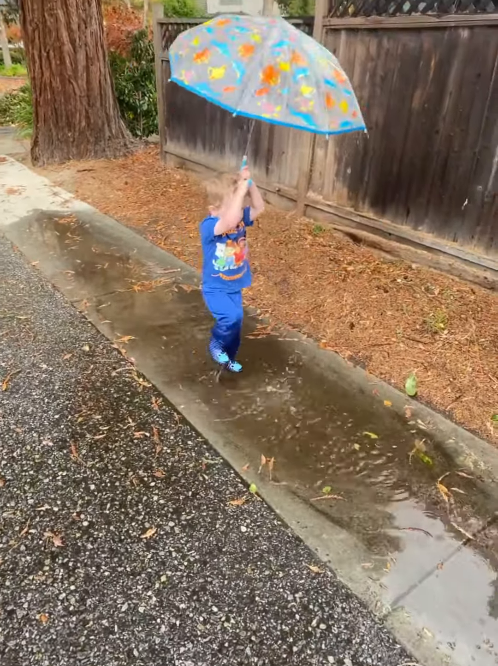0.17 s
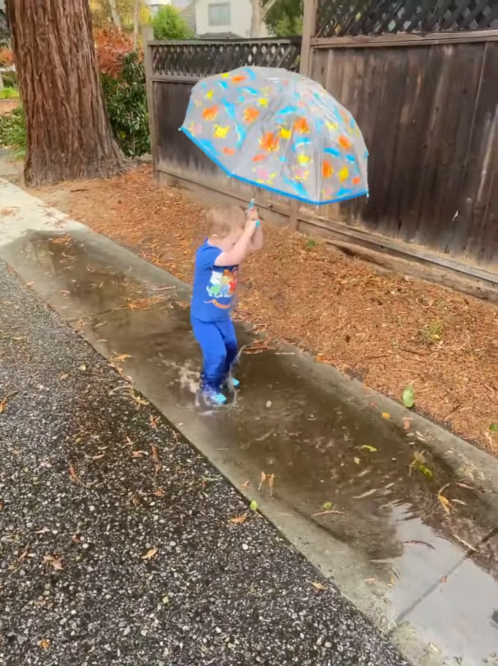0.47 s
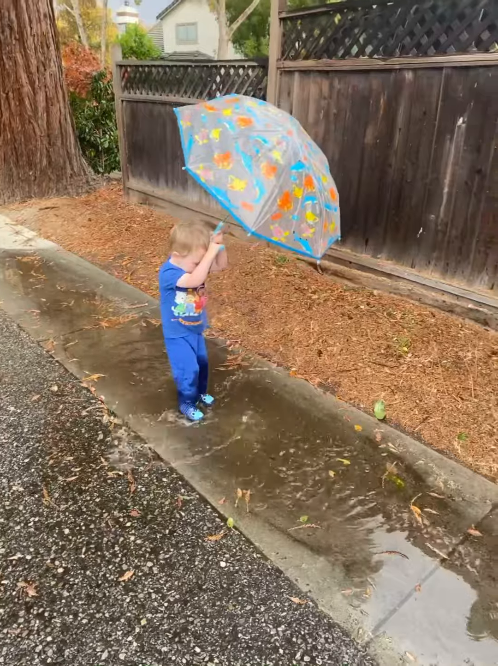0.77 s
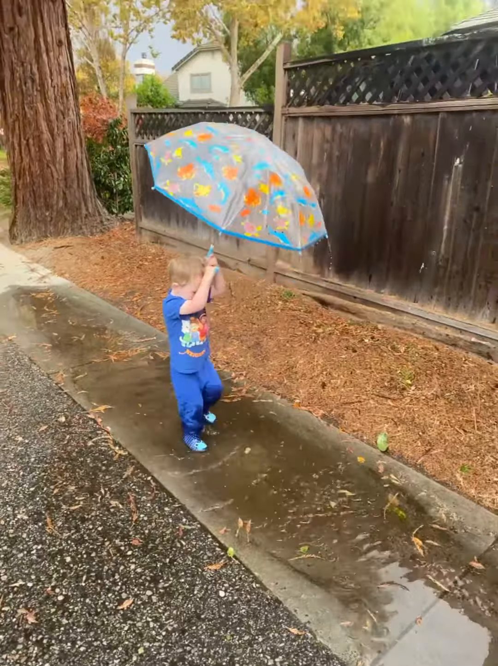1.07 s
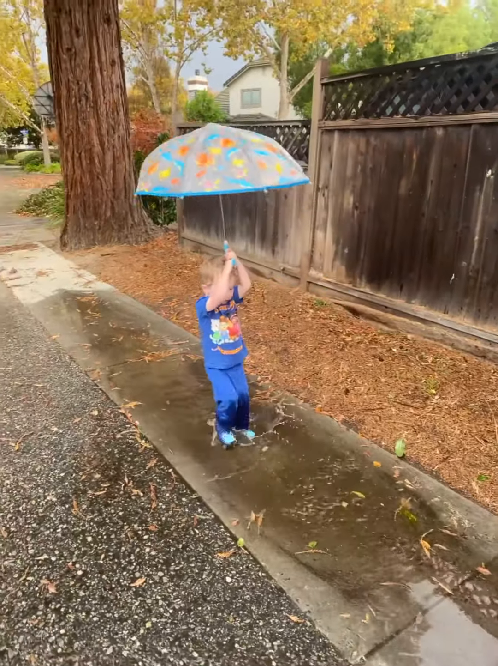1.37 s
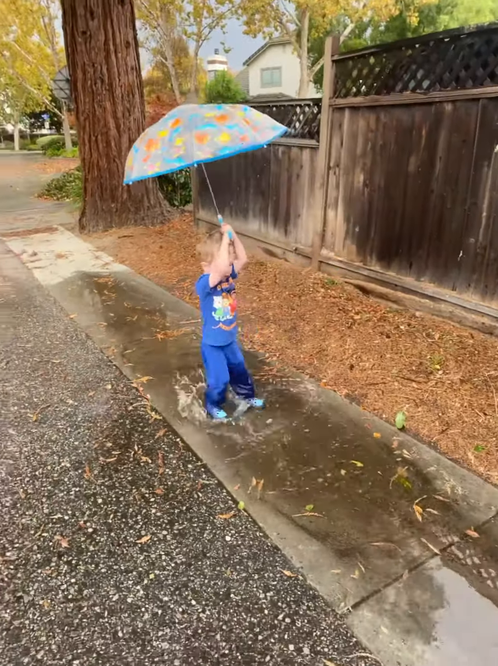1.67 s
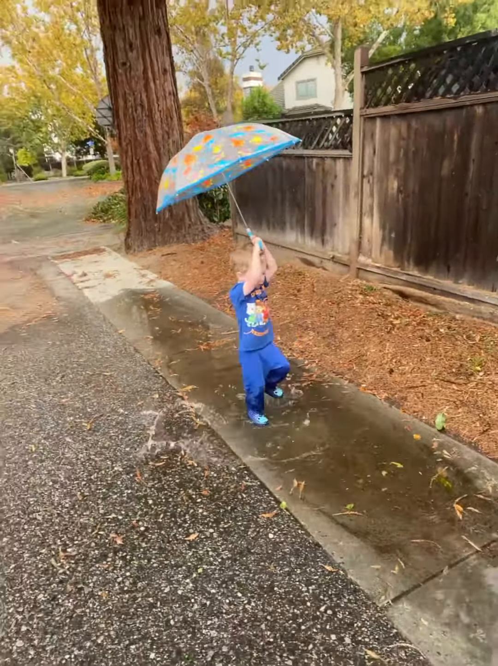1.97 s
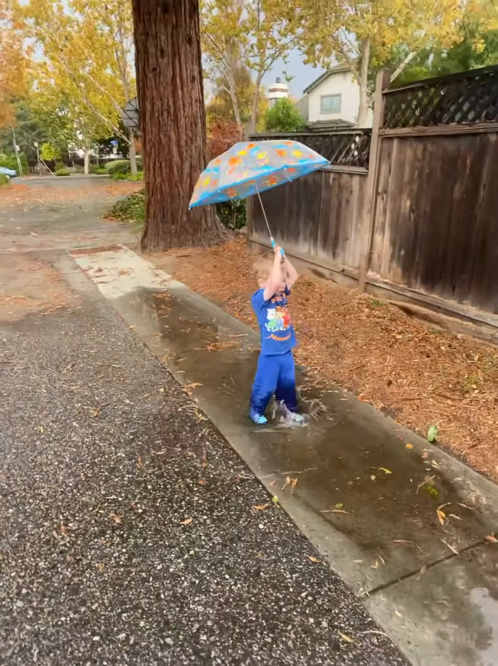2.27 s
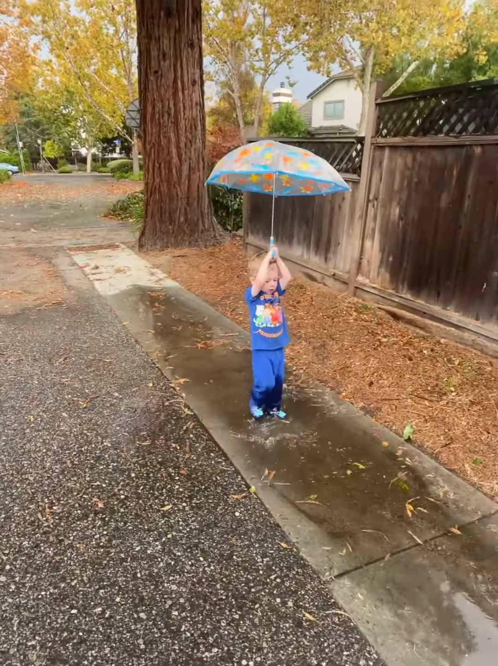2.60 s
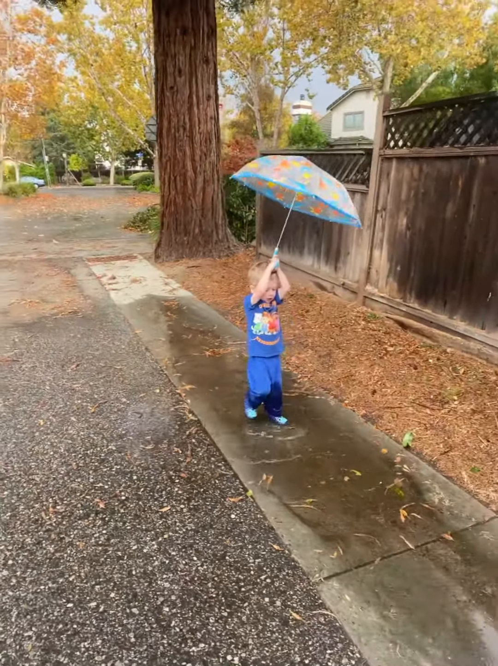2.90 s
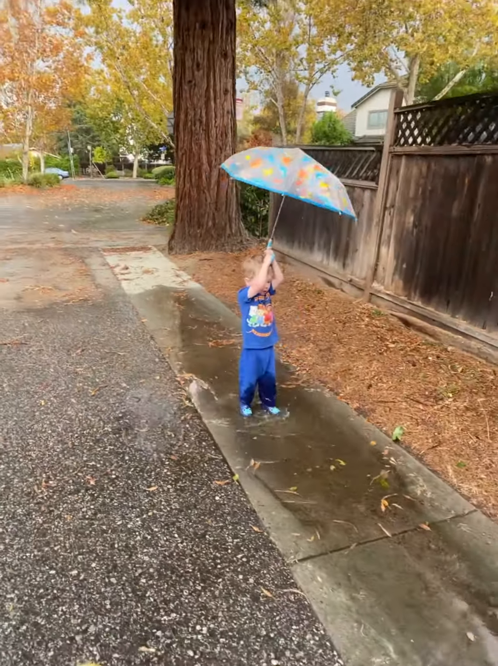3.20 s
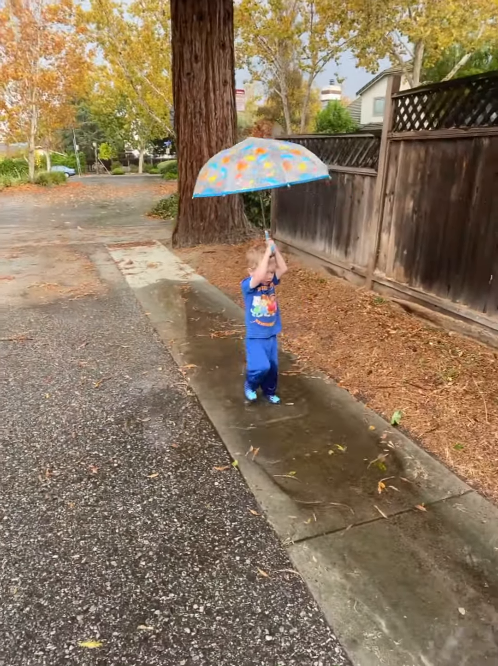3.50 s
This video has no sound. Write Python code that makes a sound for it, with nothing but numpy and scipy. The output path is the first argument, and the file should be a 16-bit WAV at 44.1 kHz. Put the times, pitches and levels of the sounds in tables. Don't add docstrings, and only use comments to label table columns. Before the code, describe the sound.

Five sharp puddle splashes from small stomping feet, each followed by pattering drops, outdoors

```python
import sys
import numpy as np
from scipy import signal
from scipy.fft import rfft, irfft
from scipy.io import wavfile
from scipy.ndimage import uniform_filter1d

SR = 44100
rng = np.random.default_rng(int(sys.argv[2]) if len(sys.argv) > 2 else 0)


def voltage_ratio(decibels):
    exponent = np.asarray(decibels, float) / 20
    return 10 ** exponent


def log_audio(samples):
    frames = np.atleast_2d(samples).T
    limited = np.clip(frames, -1, 1)
    pcm = np.round(limited * 32767).astype(np.int16)
    wavfile.write(sys.argv[1], SR, pcm)


N = 160965


def evened(x):
    return x / np.sqrt(np.mean(x ** 2) + 1e-20)


def smooth(x, first, second, axis=-1):
    return uniform_filter1d(uniform_filter1d(x, first, axis=axis), second, axis=axis)


def read(points, hz):
    f, value = np.transpose(points)
    return np.interp(np.log(hz + 1), np.log(f + 1), value)


def add(mix, s, sound):
    part = mix[round(s * SR):][:len(sound)]
    part += sound[:len(part)]


def band(x, hz, width):
    edges = np.clip([hz / (1 + width), hz * (1 + width)], 20, SR / 2.2)
    return signal.sosfilt(signal.butter(2, edges, "bandpass", fs=SR, output="sos"), x)


def noise(spectrum, patchy_db, swell_db, swell_hz):
    frames, hz = N // 256 + 5, np.fft.rfftfreq(1024, 1 / SR)
    real, imag, patches = rng.standard_normal((frames, 513, 3)).T
    patches = uniform_filter1d(patches, size=12, axis=0)
    patches = evened(uniform_filter1d(patches, size=10, axis=1))
    t = np.arange(frames) * 256 / SR
    swell = np.zeros(frames)
    for f, phase in zip(swell_hz * np.geomspace(.05, 1, num=24), rng.random(24)):
        swell += np.sin(2 * np.pi * (f * t + phase)) / np.sqrt(f)
    level_db = read(spectrum, hz)[:, None] + patchy_db * patches + swell_db * evened(swell)
    z = (real + 1j * imag) * voltage_ratio(level_db)
    return evened(signal.istft(z, nperseg=1024, noverlap=768)[1][:N])


# (f/Hz, level/dB per Hz)
STREET = [(71, -56), (120, -3.5), (240, -9.5), (459, -13.5), (530, -11.5), (1430, -10.5), (5610, -36),
          (11700, -47.5), (15500, -53)]


def street():
    return voltage_ratio(-52) * noise(STREET, patchy_db=1.8, swell_db=.7, swell_hz=5)


# (f/Hz, level/dB per Hz)
WIND = [(15, -55), (30, -16), (75, 6), (155, -2), (295, -7), (340, -18.5), (440, -72), (750, -120)]
# (t/s, length/s, peak level/dB, f/Hz)
PUFFS = [(0.147, 0.088, -43.5, 78), (0.234, 0.02, -34, 108), (.385, 0.018, -35, 170),
         (0.642, 0.03, -36, 82), (1.406, 0.062, -41.5, 77.6), (1.4, 0.014, -40.5, 248),
         (1.616, 0.015, -29, 260), (3.366, 0.014, -37.5, 273), (.17, 0.037, -43.5, 143),
         (3.553, 0.073, -40.5, 59), (1.176, 0.13, -43, 72), (1.615, 0.0273, -35, 143),
         (2.96, 0.022, -43, 142), (1.6, 0.063, -38, 88), (1.92, 0.022, -37, 76),
         (2.143, 0.058, -42.5, 88.6), (2.242, 0.032, -30.5, 94), (2.281, 0.032, -33.5, 76),
         (2.749, 0.039, -36, 80)]


def wind():
    hz = np.fft.rfftfreq(N, 1 / SR)
    lumps = evened(irfft(rfft(rng.standard_normal(N)) / (1 + (hz / 9) ** 2), N))
    rumble = evened(irfft(rfft(rng.standard_normal(N)) * voltage_ratio(read(WIND, hz)), N))
    out = voltage_ratio(-51 + 2.2 * lumps) * rumble
    for (s, length, db, f), phase in zip(PUFFS, rng.random((len(PUFFS), 1))):
        t = np.arange(0, length, 1 / SR)
        add(out, s, voltage_ratio(db) * np.sin(np.pi * t / length) * np.sin(2 * np.pi * (f * t + phase)))
    return out


# (f/Hz, level/dB)
DROP = [(500, -12.5), (1500, 1.5), (3000, -1), (6000, -10), (16000, -32.5)]
# (first t/s, thickest t/s, last t/s, level/dB)
SHOWERS = [
    (0.463, 0.753, 1, -51.5),
    (1.414, 1.589, 1.803, -45.5),
    (1.722, 1.977, 2.23, -50.5),
    (2.303, 2.54, 2.795, -52),
    (3.053, 3.19, 3.73, -57.5),
]


def splatter():
    drops_per_s, spread_db, drips_db, thin_db, mist_db = 4000, 3.3, -68, -24, -11
    t = np.arange(N) / SR
    level = voltage_ratio(drips_db)
    for first, thickest, last, db in SHOWERS:
        thinness = np.interp(t, [first, thickest, last], [1, 0, 1], 3, 3)
        level = level + voltage_ratio(db + thin_db * thinness ** 1.4)
    clumps = voltage_ratio(5 * evened(uniform_filter1d(rng.standard_normal(N), size=260)))
    lands = rng.random(N) < drops_per_s / SR * clumps
    size = lands * voltage_ratio(spread_db * np.minimum(rng.exponential(1, N), 4.2))
    kind, out = rng.integers(0, 32, N), np.zeros(N)
    for k, (place, cycles, glide) in enumerate(rng.random((32, 3))):
        hz = 600 * 22 ** ((k + place) / 32)
        length_s = (3 + 12 * cycles ** 2) / np.sqrt(hz * min(hz, 2500))
        grain = bubble(hz, hz * (1 + .35 * glide), length_s, read(DROP, hz))
        out += signal.oaconvolve(size * (kind == k), grain)[:N]
    mist = noise(DROP, patchy_db=1, swell_db=2, swell_hz=80)
    return (evened(out) + voltage_ratio(mist_db) * mist * np.sqrt(clumps)) * level


# (t/s, peak level/dB, f/Hz)
TICKS = [(0.061, -48, 3000), (.129, -45.5, 3140), (.194, -58, 9000), (0.24, -54.5, 7140), (.374, -44, 4000),
         (0.375, -28, 3500), (.558, -56, 6000), (.636, -44, 3900), (.6435, -54, 7000), (.657, -56, 8500),
         (.676, -46, 4930), (0.7075, -39, 2920), (.712, -59, 7000), (.723, -61, 11000),
         (.7343, -39.5, 5000), (.747, -60, 9000), (0.795, -38.5, 4100), (.806, -57, 8000),
         (.8465, -38, 4430), (.881, -51, 5900), (.9124, -51, 5000), (.917, -39.5, 2190), (.951, -61, 6500),
         (.966, -52, 5400), (1.0835, -62, 9000), (1.14, -54, 9950), (1.43, -49, 3750), (1.4635, -51, 2200),
         (1.492, -57, 4000), (1.5114, -47, 5030), (1.5413, -52, 5000), (1.558, -34, 2000),
         (1.5612, -40, 4000), (1.570, -34, 2980), (1.662, -36, 3700), (1.665, -36, 3580),
         (1.8145, -45, 4400), (1.828, -51, 6000), (1.842, -57.5, 9400), (1.8496, -41.5, 3400),
         (1.936, -48, 2500), (1.922, -43, 4400), (1.933, -51, 5000), (1.9637, -40, 3800),
         (1.969, -54, 9000), (1.981, -51, 10000), (1.985, -39.5, 5000), (2.0, -46, 8000),
         (2.010, -42, 5500), (2.0228, -35, 5230), (2.038, -49, 8040), (2.0918, -44.5, 3700)]
LATE_TICKS = [(2.275, -46, 3600), (2.386, -42.5, 4000), (2.427, -39, 3840), (2.427, -46, 7960),
              (2.479, -49, 5000), (2.524, -54, 4500), (2.5646, -53, 3500), (2.59, -57, 3000),
              (3.1787, -44.5, 5160), (3.2426, -59, 3500), (3.2496, -51, 5000), (3.3374, -51, 3200),
              (3.3658, -45, 3300)]


def tick(s, db, hz, hiss):
    t = np.arange(len(hiss)) / SR
    snap = evened(band(hiss, hz, .16)) + voltage_ratio(-15) * evened(band(hiss, hz, 1.1))
    snap = snap * np.minimum(t / .00069, 1) * np.exp(-t / .0018)
    return s, voltage_ratio(db) * snap / abs(snap).max()


# (t/s, first f/Hz, last f/Hz, length/s, peak level/dB)
BUBBLES = [(.280, 600, 590, 0.012, -45.5), (.194, 1840, 1880, 0.02, -50), (0.516, 1660, 3380, 0.035, -40.5),
           (.566, 1290, 1300, 0.014, -38), (0.604, 2870, 2910, 0.011, -37.5),
           (0.616, 1850, 2040, 0.053, -49), (0.691, 870, 910, 0.036, -44), (.726, 2030, 2700, 0.013, -41.5),
           (0.807, 1460, 1650, 0.0089, -45), (0.819, 2070, 2650, 0.0042, -42),
           (0.848, 1180, 4250, 0.0071, -31.5), (.862, 2620, 2930, 0.0038, -32.5),
           (.921, 1690, 1730, .012, -41.5), (1.2722, 2170, 2550, .0012, -19.5),
           (1.2735, 3230, 3440, .0025, -33), (1.2795, 2640, 2300, .004, -34.5),
           (.387, 1680, 1570, 0.0081, -26.5), (0.858, 1327, 1310, 0.048, -46),
           (.881, 3000, 3300, 0.0035, -36.5), (0.898, 1006, 2540, 0.081, -43.5),
           (1.395, 910, 2380, 0.0074, -33.5), (1.465, 2060, 2100, .018, -40),
           (1.514, 1480, 2060, 0.0082, -35.5), (1.534, 1180, 2620, 0.019, -35.5),
           (1.68, 963, 1010, 0.037, -43.5),]
LATE_BUBBLES = [(1.806, 1360, 2120, 0.015, -40.5), (1.882, 1075, 1144, 0.012, -41.5),
                (1.936, 1587, 1720, 0.014, -39), (1.984, 1840, 1890, 0.0043, -26.5),
                (2.05, 2200, 1890, 0.014, -43), (2.484, 1900, 2300, .01, -41),
                (2.447, 1430, 1500, 0.011, -41.5), (3.341, 1010, 1100, 0.0072, -42),
                (3.350, 1350, 1300, 0.0088, -35), (3.352, 704, 750, 0.018, -41.5),
                (2.494, 1550, 2100, 0.02, -40), (2.528, 1460, 1590, 0.014, -39),
                (2.569, 2150, 1790, 0.0025, -26), (2.599, 1950, 2000, 0.011, -33.5),
                (3.178, 2590, 2660, 0.012, -39.5), (3.221, 860, 920, 0.02, -40.5),
                (3.36, 1400, 1370, 0.0079, -31), (3.376, 1610, 1570, 0.0053, -26)]


def bubble(first_hz, last_hz, length, db):
    u = np.arange(0, length, 1 / SR) / length
    pitch = first_hz + (last_hz - first_hz) * u ** 1.6
    haste = np.clip((last_hz - first_hz) / length / 1e5 - .4, 0, 1)
    wobble_db = 4 * np.sin(2 * np.pi * u * length * first_hz / 13)
    edge = np.minimum(u / min(.0012 / length, .3), 1) * np.minimum((1 - u) / .2, 1)
    fade_db = -19.5 * ((1 - haste) * u + haste * abs(u - .6) * .6)
    return edge * voltage_ratio(db + fade_db + wobble_db) * np.sin(2 * np.pi * np.cumsum(pitch) / SR)


# (t/s, crack level/dB, pocket f/Hz, pocket level/dB, pocket ring/s)
SLAPS = [(0.3774, -12.5, 1710, -18, 0.005), (1.272, -23.5, 3330, -34, 0.001),
         (1.281, -31, 1420, -33.5, 0.0076), (1.586, -24, 875, -34, 0.014), (1.600, -39, 1996, -18, 0.0039),
         (1.614, -44, 854, -30, 0.013), (2.2132, -19.5, 3490, -14.5, 0.0018),
         (2.224, -38, 1260, -34, 0.017), (2.941, -31, 810, -35, 0.006), (2.954, -46, 1500, -22, 0.0012),
         (2.969, -57, 595, -35.5, 0.014)]


def slap(s, crack_db, hz, pocket_db, ring_s, hiss):
    drop_s, end_hz, roughness, crack_s, crack_hz = .0025, 230, .5, .0011, 2400
    t = np.arange(len(hiss)) / SR
    churn = evened(smooth(hiss[::-1], 60, 60))
    pitch = end_hz + hz / (1 + t / drop_s) ** 2
    pitch = pitch * (1 + roughness * np.tanh(churn) * np.minimum(t / .005, 1))
    pocket = np.sin(2 * np.pi * np.cumsum(pitch) / SR) * (1 - np.exp(-t / .0006)) * np.exp(-t / ring_s)
    impact = 4 * (np.arange(len(t)) == 8)
    crack = band(hiss * np.exp(-t / crack_s) - impact, crack_hz, 2.5)
    crack = smooth(crack, 3, 2)
    return s, voltage_ratio(pocket_db) * pocket + voltage_ratio(crack_db) * crack / abs(crack).max()


# (t/s, length/s, level/dB, brightness/dB per octave)
SPRAYS = [(0.381, 0.031, -28.5, -0.5), (1.274, 0.044, -35.5, 2.5), (1.593, 0.04, -32, -1.5),
          (2.2101, 0.041, -34.5, 3.5), (2.482, 0.023, -50, -3), (2.518, 0.031, -43.5, -3.5),
          (2.94, 0.083, -41, 2.5), (3.169, 0.069, -49, -1.5), (3.212, 0.055, -44.5, -5),
          (3.327, 0.07, -35.5, -8.5), (.70, 0.051, -56, 2)]
# (f/Hz, level/dB per Hz)
SPRAY = [(180, -6), (300, -7), (1150, -1.5), (1560, 1), (3580, -10.5), (4750, -12.5), (16000, -40.5)]


def spray(s, length, db, tilt_db, hiss, draw, size):
    grits_per_s, grit_db, torn_db = 3000, 1, 3.8
    hz, u = np.fft.rfftfreq(len(hiss), 1 / SR), np.arange(len(hiss)) / SR / length
    grit = (draw < grits_per_s / SR) * voltage_ratio(grit_db * np.minimum(size, 3.5))
    grit = uniform_filter1d(grit, size=24)
    z = signal.stft(hiss * (1 + evened(grit)), nperseg=128, noverlap=96)[2]
    torn = uniform_filter1d(rng.standard_normal(z.shape), size=2, axis=0)
    torn = evened(uniform_filter1d(torn, size=5, axis=1))
    source = signal.istft(z * voltage_ratio(torn_db * torn), nperseg=128, noverlap=96)[1][:len(hiss)]
    colour = voltage_ratio(read(SPRAY, hz) + tilt_db * np.log2((hz + 300) / 2000))
    colour = colour * hz ** 2 / (hz ** 2 + 600 ** 2)
    rise = np.clip(.17 - .07 * tilt_db, .04, .6)
    decay = voltage_ratio(-30 * np.maximum(u - rise, 0) ** 1.2) + voltage_ratio(-24 - 11 * u)
    shape = np.minimum(u / rise, 1) * decay
    return s, voltage_ratio(db) * shape * evened(irfft(rfft(source) * colour, len(hiss)))


def fence_echo(near):
    level_db, t60_s, delay_s = -19, .07, .004
    t = np.arange(3000) / SR
    tail = rng.standard_normal(3000) * voltage_ratio(-60 * t / t60_s) * (t > delay_s)
    return voltage_ratio(level_db) * signal.oaconvolve(near, tail / np.linalg.norm(tail))[:N]


def scene():
    background = street() + wind() + splatter()
    near = np.zeros(N)
    for row in TICKS + LATE_TICKS:
        add(near, *tick(*row, rng.standard_normal(500)))
    for s, *row in BUBBLES + LATE_BUBBLES:
        add(near, s, bubble(*row))
    for row in SLAPS:
        add(near, *slap(*row, rng.standard_normal(3000)))
    for row in SPRAYS:
        add(near, *spray(*row, rng.standard_normal(8192), rng.random(8192), rng.exponential(1, 8192)))
    return (background + near + fence_echo(near))[None]


def band_limit(x):
    return signal.sosfilt(signal.butter(12, 16430, fs=SR, output="sos"), x)


# (from t/s, to t/s)
GAPS = [
    (.2220, .2399),
    (1.7097, 1.7258),
    (3.5912, 3.6068),
]


def record(dry):
    t, heard = np.arange(N) / SR, np.ones(N)
    for start, end in GAPS:
        heard[(t > start) & (t < end)] = 0
    gapped = dry * uniform_filter1d(heard, size=5)
    low_pass = signal.firwin(255, 15950, window=("kaiser", 8), fs=SR)[None]
    mix = signal.oaconvolve(gapped, low_pass, "same")
    return band_limit(mix)


dry = scene()
out = record(dry)
log_audio(out)
```